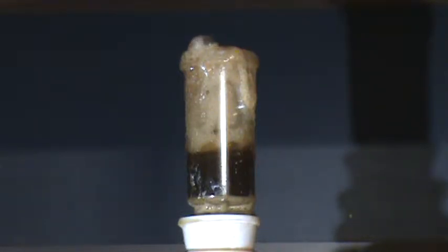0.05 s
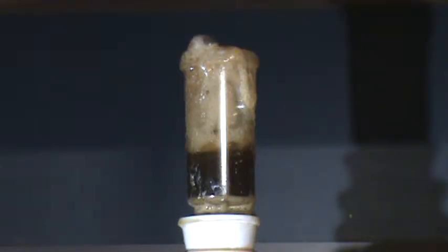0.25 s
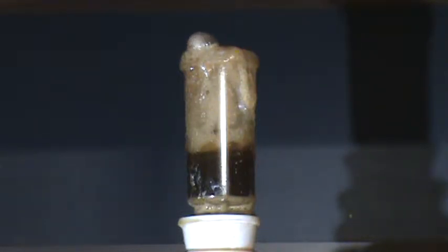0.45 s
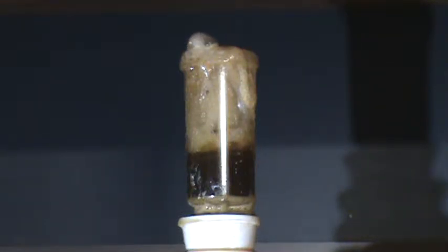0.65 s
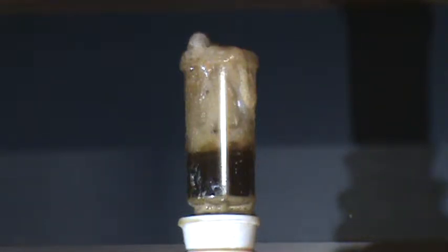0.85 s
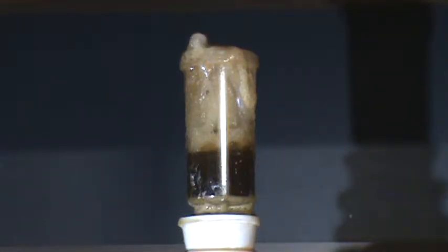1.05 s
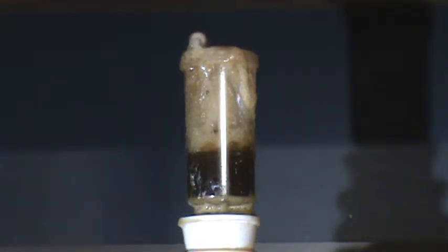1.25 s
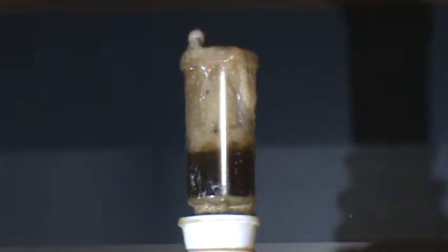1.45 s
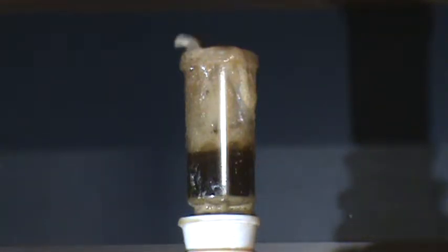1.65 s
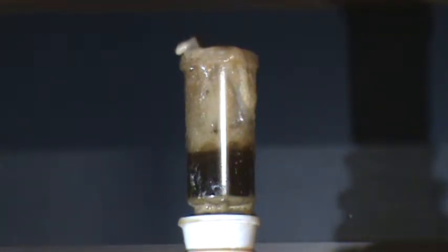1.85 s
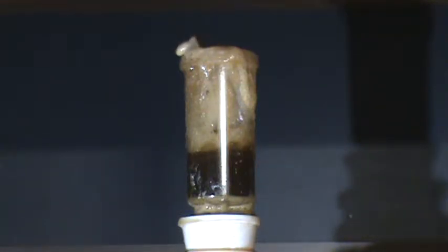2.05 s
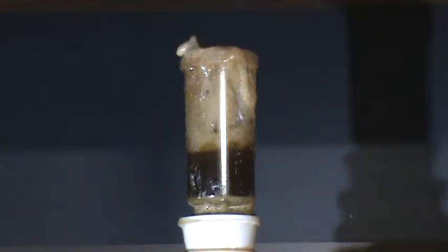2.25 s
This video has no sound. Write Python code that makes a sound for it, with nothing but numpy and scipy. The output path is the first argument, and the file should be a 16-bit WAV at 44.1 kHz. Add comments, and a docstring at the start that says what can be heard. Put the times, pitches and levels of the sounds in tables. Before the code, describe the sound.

Foam sputters out of a fermentation airlock close to the microphone. A few short spurts build into a wet, crackling gush, which dies down to a thin hiss. An appliance hums faintly in the quiet room.

```python
"""Airlock foaming over

Close up in a quiet room, the airlock straight ahead of a stereo microphone. Fermentation gas forces
foam out through the cap: a few short spurts, then a sputtering gush of bursting films that rings the
cap and its cavity. It dies down to a thin hiss from a narrow gap. An appliance hums faintly behind."""
import sys
import numpy as np
from scipy import signal
from scipy.fft import rfft, irfft
from scipy.io import wavfile

SR = 44100
rng = np.random.default_rng(int(sys.argv[2]) if len(sys.argv) > 2 else 0)


def file_out(sig):
    """Save sig as 16-bit WAV at sys.argv[1]."""
    # one column per channel
    cols = np.atleast_2d(sig).T
    # limit, then scale
    lim = np.clip(cols, -1, 1)
    pcm = np.round(lim * 32767).astype(np.int16)
    wavfile.write(sys.argv[1], SR, pcm)


N = 105840
T = np.arange(N) / SR
FFT_SIZE = 2 ** 17
HZ = np.maximum(np.fft.rfftfreq(FFT_SIZE, 1 / SR), 1)

# room tone spectrum (frequency [Hz], relative level [dB])
ROOM_TONE_COLOUR = [(20, -12), (45, -17), (65, -3), (90, 9), (130, 1.5), (180, -0.5), (350, -2.5),
                    (700, -1.5), (1100, -4), (1500, -6.5), (3000, -11), (8000, -12.5), (15500, -13.5)]
# stereo width of the room tone (frequency [Hz], side minus mid [dB])
ROOM_TONE_WIDTH = [(30, -10), (90, -31), (180, -12.5), (300, -3.5), (700, 0), (1500, 1), (3000, 1),
                   (6000, -16), (10000, -7), (15000, -28)]
# appliance tones (frequency [Hz], start level [dB], end level [dB], phase wander [rad])
HUM_TONES = [(94, -69, -61, .8), (126, -64, -68, .7), (280, -78, -77, .6), (326, -73, -77, .6),
             (356, -76, -77, .6), (652, -74, -75, .6), (932.5, -66, -61.5, .3), (1120, -64, -57.5, .3)]
# stereo width of the reverberation (frequency [Hz], side minus mid [dB])
REVERB_WIDTH = [(1700, -17), (2400, -5.5), (4500, -7), (6000, -21), (8000, -47.5), (10000, 3.5), (15000, 3)]

# hiss of the narrow gap (time [s], level [dB])
HISS_LEVEL = [(.5, -65.5), (1.2, -50), (1.29, -32), (1.37, -28.5), (1.42, -35), (1.6, -36), (1.67, -39),
              (1.8, -38.5), (1.92, -37.5), (2.0, -39), (2.14, -38.5), (2.24, -40), (2.4, -39)]
# brief flares of the hiss (start [s], length [s], level [dB])
HISS_FLARES = [(1.485, 0.0043, -33), (1.748, 0.0045, -42), (2.010, 0.0088, -37), (2.102, 0.01, -36),
               (2.157, .010, -38.5), (2.312, 0.019, -42)]
# broad spectrum of the hiss (frequency [Hz], relative level [dB])
HISS_COLOUR = [(300, -32), (600, -34), (1500, -12.5), (4000, -7.5), (6000, -5.5), (8000, 1), (11000, -9),
               (13500, -20.5), (15500, -15)]
# cap and cavity resonances and dips in the hiss (frequency [Hz], width [Hz], lift [dB])
HISS_RESONANCES = [(2327, 140, 9.5), (2580, 110, -7.5), (4970, 110, 3.5), (5100, 110, -4), (5530, 260, 5.5),
                   (6220, 230, 6), (6851, 56, 0), (7320, 190, 7), (7720, 92, 5), (8280, 130, 4.5),
                   (9350, 74, 9.5), (10747, 68, 7)]

# steady gas flow through the foam (time [s], level [dB])
GAS_FLOW = [(.405, -75), (.425, -35), (.476, -35.5), (.482, -26.5), (.59, -23.3), (.645, -25), (.69, -23.5),
            (.76, -23), (.79, -25.5), (.95, -27), (1.0, -24.5), (1.2, -24.5), (1.275, -31), (1.288, -31),
            (1.44, -32), (1.475, -37.5), (1.61, -39.5), (1.66, -48), (2.4, -62)]
# spurts of gas, alone or on top of the flow (start [s], length [s], level [dB])
GAS_SPURTS = [(.020, .003, -42.5), (.037, 0.0039, -42.5), (.2142, .021, -30), (.284, 0.0092, -39),
              (.291, 0.0086, -33.5), (.311, 0.029, -35), (.334, 0.03, -31.5), (.410, 0.032, -33.5),
              (.524, 0.018, -45), (.657, 0.014, -28), (.770, 0.01, -25), (.799, 0.014, -23),
              (.825, 0.02, -23.5), (.856, 0.012, -22), (.873, 0.02, -23), (.907, 0.014, -23),
              (.934, 0.017, -23.5), (.957, 0.02, -23.5), (.995, 0.0083, -23.5), (1.070, 0.014, -26),
              (1.165, 0.021, -32), (1.231, 0.042, -28.5), (1.275, .006, -26), (1.433, .014, -33),
              (1.540, 0.014, -34.5), (1.600, 0.02, -39.5)]
# lift of the gush's low, wet part (time [s], gain [dB])
FOAM_WETNESS = [(.02, 3), (.22, -3.5), (.4, -0.5), (.49, 4.5), (.58, -1), (.8, -2), (.9, -1.5), (1.0, 2),
                (1.15, 4), (1.26, 6.5), (1.31, -7), (1.6, 1)]
# broad spectrum of the gush (frequency [Hz], relative level [dB])
FOAM_COLOUR = [(250, -40.5), (600, -32.5), (1100, -20.5), (1450, -16.5), (1750, -9), (3800, -0.5),
               (6500, 1), (8200, 0), (11000, -16), (13500, -32), (15500, -27)]
# cap and cavity resonances and dips in the gush (frequency [Hz], width [Hz], lift [dB])
FOAM_RESONANCES = [(1750, 300, 4.5), (2140, 73, 6.5), (2260, 128, -11), (2480, 165, 6), (2653, 100, -9.5),
                   (2900, 160, 8), (3125, 182, -9), (3430, 120, 3), (4024, 56, 3.5), (4320, 180, 5.5),
                   (4470, 102, -6), (5130, 104, -9.5), (5338, 215, 8), (5560, 130, -5.5), (6152, 76, 8.5),
                   (6460, 170, -6.5), (7010, 120, -10), (7260, 160, 6), (7771, 103, 7), (7970, 108, 4),
                   (9300, 76, 6)]


def from_db(db):
    """Decibels to gain."""
    return 10 ** (np.asarray(db) / 20)


def unit_rms(x):
    """Scale to unit power."""
    return x / np.sqrt(np.mean(x ** 2) + 1e-20)


def envelope(rows):
    """Gain at every sample from (time [s], level [dB]) rows."""
    return from_db(np.interp(T, *np.transpose(rows)))


def spectrum(rows):
    """Gain at every frequency from (frequency [Hz], level [dB]) rows."""
    hz, db = np.transpose(rows)
    return from_db(np.interp(np.log(HZ), np.log(hz), db))


def filtered(x, response):
    """Apply a frequency response."""
    return irfft(rfft(x, FFT_SIZE) * response, FFT_SIZE)[..., :N]


def drift(rate_hz):
    """Smooth random motion of unit power, mostly slower than rate_hz."""
    return unit_rms(filtered(rng.standard_normal(FFT_SIZE), 1 / (1 + (HZ / rate_hz) ** 2)))


def room_tone(level_db=-54.5, swell_db=3):
    """Soft noise all around the microphone, slowly growing; returns mid and side."""
    colour = from_db(level_db) * unit_rms(spectrum(ROOM_TONE_COLOUR))
    swell = from_db(swell_db * np.linspace(-.5, .5, N))
    mid = filtered(rng.standard_normal(N), colour)
    side = filtered(rng.standard_normal(N), colour * spectrum(ROOM_TONE_WIDTH))
    return swell * mid, swell * side


def appliance_hum(waver_db=0.86):
    """Faint tones from behind the airlock, each wavering in level and phase."""
    hum = np.zeros(N)
    for hz, start_db, end_db, wander in HUM_TONES:
        level = from_db(np.linspace(start_db, end_db, N) + waver_db * drift(rate_hz=6.4))
        phase = 2 * np.pi * hz * T + wander * drift(rate_hz=3.5)
        hum += np.sqrt(2) * level * np.sin(phase)
    return hum


def reflections(x, decay_s, delay_s):
    """Diffuse echoes of x that reach the microphone after a delay and die away; unit power gain."""
    response = rng.standard_normal(N) * np.exp(-T / decay_s) * (T > delay_s)
    return signal.fftconvolve(x, response / np.sqrt(np.sum(response ** 2)))[:N]


def room_reverb(x, t60_s=0.18, level_db=-12):
    """The room's short, faint reverberation; returns mid and side."""
    decay_s = t60_s / np.log(1000)
    mid, side = (from_db(level_db) * reflections(x, decay_s, delay_s=0.0079) for _ in range(2))
    return mid, filtered(side, spectrum(REVERB_WIDTH))


def cap_response(colour, resonances):
    """The cap and its cavity ring: resonances and dips on a broad colour, at unit power."""
    lift_db = sum(db / (1 + (2 * (HZ - hz) / width) ** 2) for hz, width, db in resonances)
    gain = unit_rms(spectrum(colour) * from_db(lift_db))
    # minimum phase, so the ringing follows each pop
    cepstrum = irfft(np.log(gain))
    causal_window = 1 + np.sign(np.fft.fftfreq(FFT_SIZE))
    return np.exp(rfft(cepstrum * causal_window))


def gas_drive(steady, puffs, attack_s=0.0022, release_s=0.003):
    """Amplitude of escaping gas: a steady flow plus puffs that open fast, hold and close."""
    power = envelope(steady) ** 2
    for start, length, db in puffs:
        opening = np.clip((T - start) / attack_s, 0, 1)
        closing = np.exp(-np.maximum(T - start - length, 0) / release_s)
        power += (from_db(db) * opening * closing) ** 2
    return np.sqrt(power)


def bursting_foam(pops_per_s, size_spread_db, jet_db, flutter_db, flutter_hz):
    """Films burst as dense, uneven clicks over jet noise, both fluttering together; unit power."""
    sizes = from_db(size_spread_db * np.minimum(rng.exponential(1, N), 3))
    signs = rng.choice([-1, 1], N)
    bursts = rng.random(N) < pops_per_s / SR
    pops = unit_rms(sizes * signs * bursts)
    jet = from_db(jet_db) * rng.standard_normal(N)
    flutter = from_db(flutter_db * drift(flutter_hz))
    return unit_rms((pops + jet) * flutter)


def gap_hiss():
    """The last pressure escapes through a narrow gap as a thin, finely crackling hiss."""
    fizz = bursting_foam(pops_per_s=3300, size_spread_db=-1.5, jet_db=5, flutter_db=0.47, flutter_hz=56)
    drive = gas_drive(HISS_LEVEL, HISS_FLARES)
    return filtered(drive * fizz, cap_response(HISS_COLOUR, HISS_RESONANCES))


def foam_gush(wet_below_hz=3800):
    """Spurts and steady flow tear the foam and ring the cap; wetter foam sounds lower."""
    foam = bursting_foam(pops_per_s=9000, size_spread_db=3, jet_db=-4.5, flutter_db=0.7, flutter_hz=260)
    drive = gas_drive(GAS_FLOW, GAS_SPURTS)
    gush = filtered(drive * foam, cap_response(FOAM_COLOUR, FOAM_RESONANCES))
    wet_part = filtered(gush, 1 / (1 + (HZ / wet_below_hz) ** 6))
    return gush + wet_part * (envelope(FOAM_WETNESS) - 1)


def scene():
    """The airlock close and centred, the hum behind it, the room spread left and right."""
    direct = foam_gush() + gap_hiss()
    scatter_gain = from_db(-9.5)  # off the surfaces close by
    scatter = scatter_gain * reflections(direct, decay_s=0.0051, delay_s=0.0014)
    airlock = (direct + scatter) / np.hypot(1, scatter_gain)
    reverb_mid, reverb_side = room_reverb(airlock)
    tone_mid, tone_side = room_tone()
    mid = tone_mid + appliance_hum() + reverb_mid + airlock
    side = tone_side + reverb_side
    return np.array([mid + side, mid - side])


def record(dry, cutoff_hz=15800):
    """The microphone signal, with the highest treble cut steeply."""
    return filtered(dry, 1 / np.sqrt(1 + (HZ / cutoff_hz) ** 300))


dry = scene()
out = record(dry)
file_out(out)
```